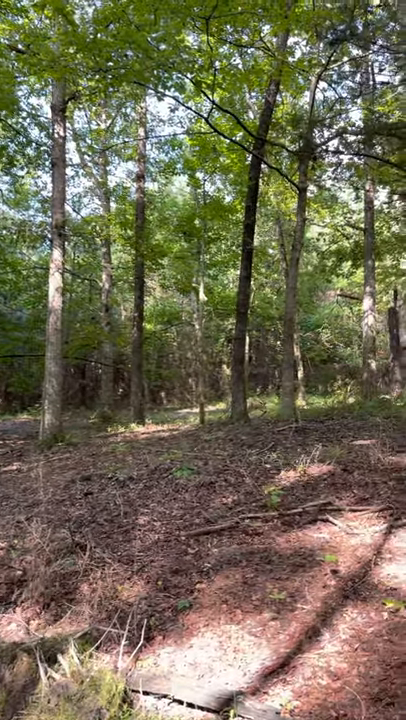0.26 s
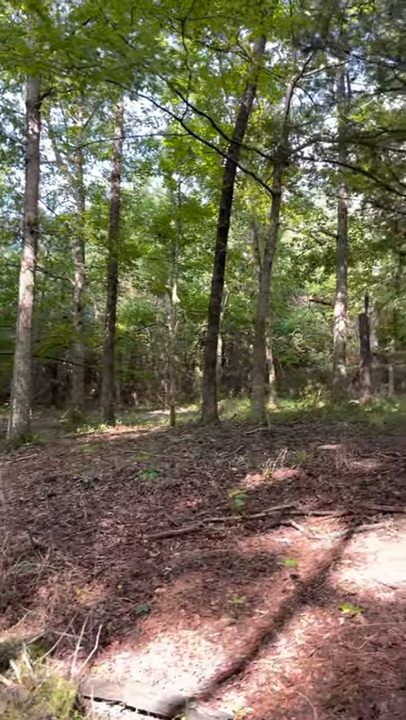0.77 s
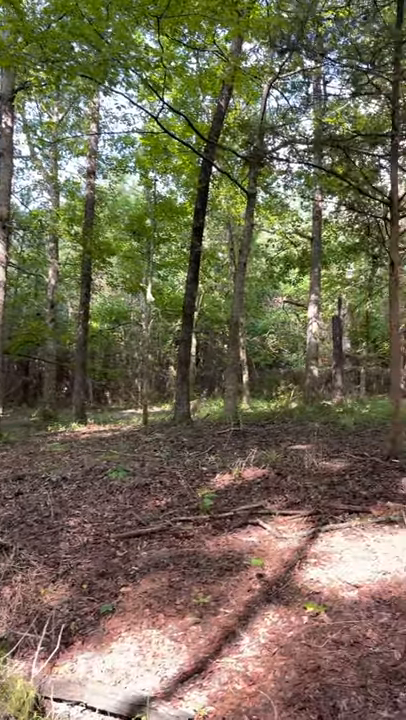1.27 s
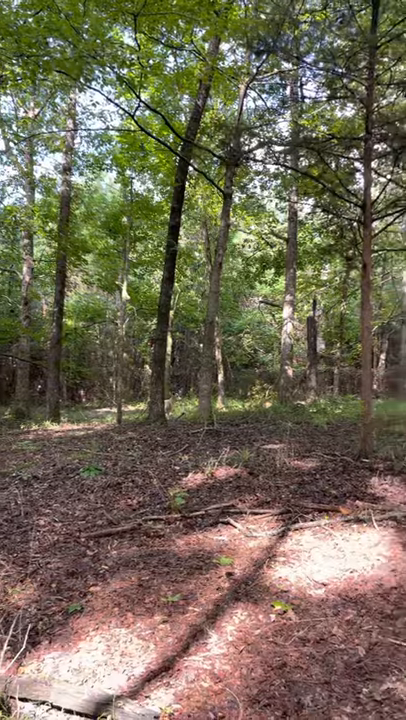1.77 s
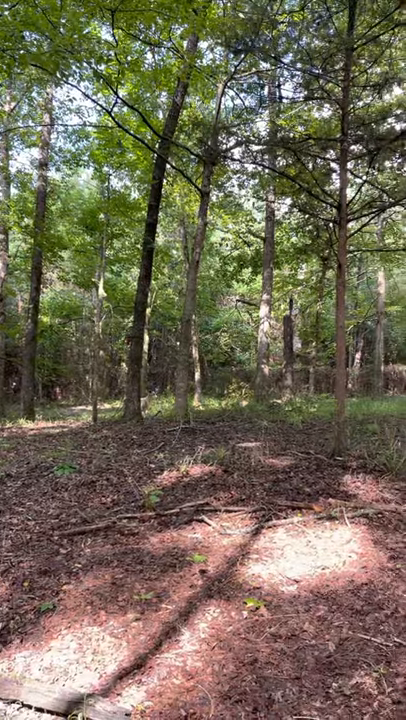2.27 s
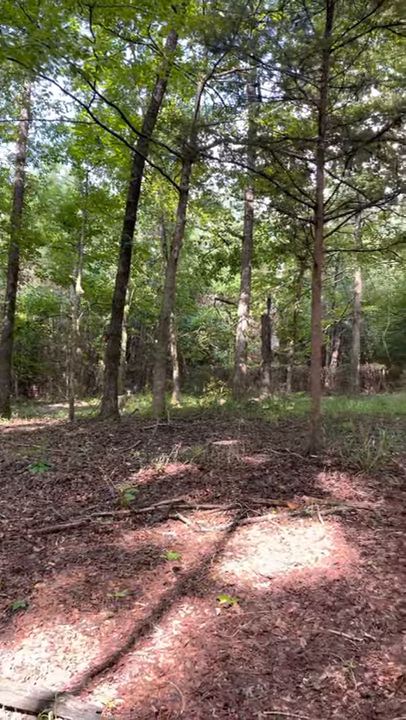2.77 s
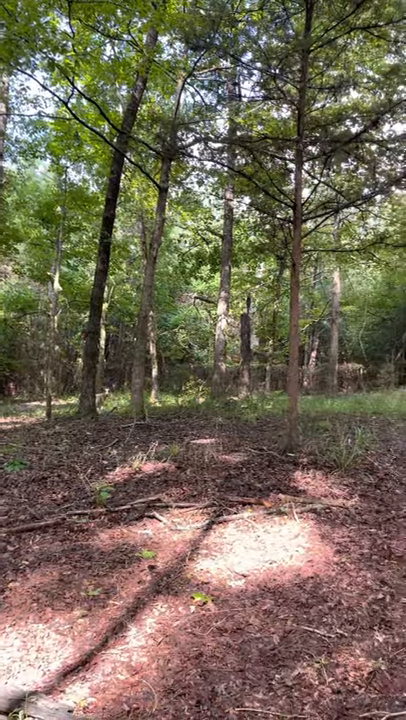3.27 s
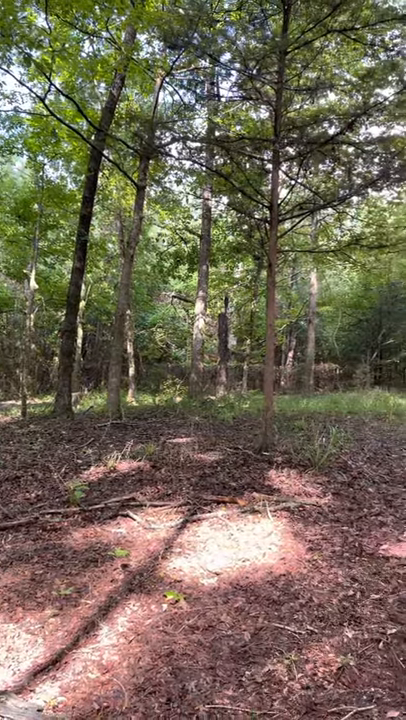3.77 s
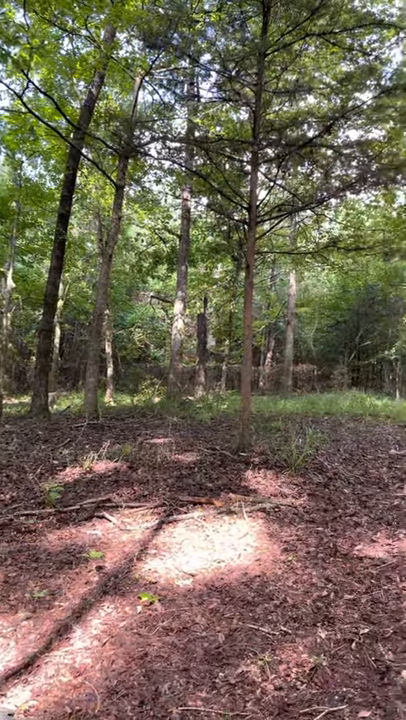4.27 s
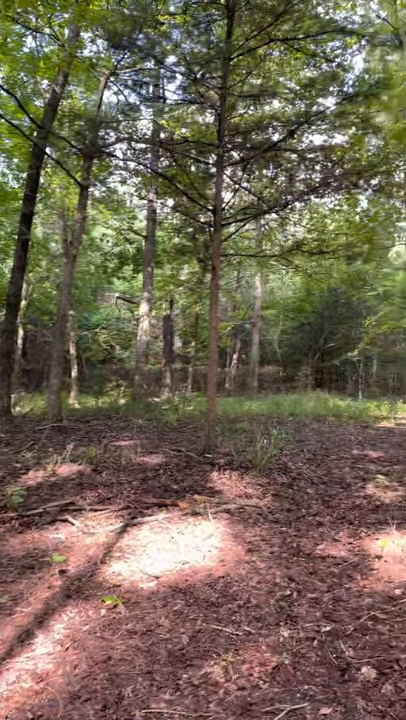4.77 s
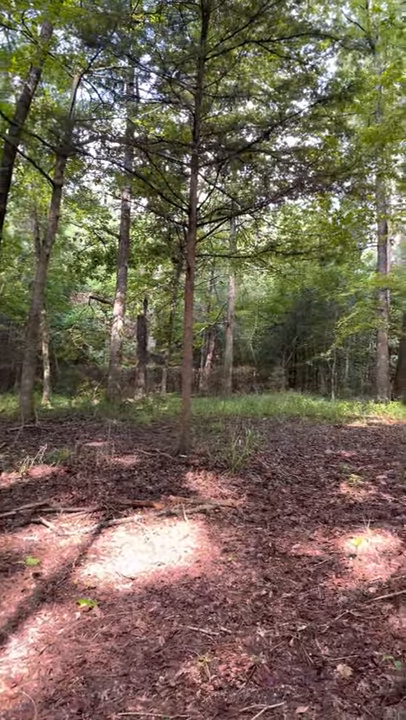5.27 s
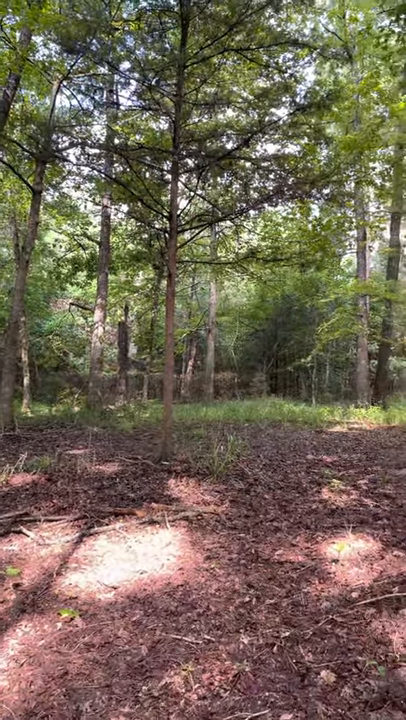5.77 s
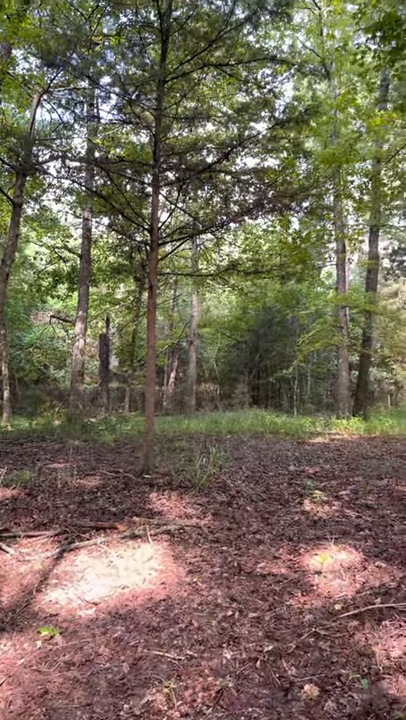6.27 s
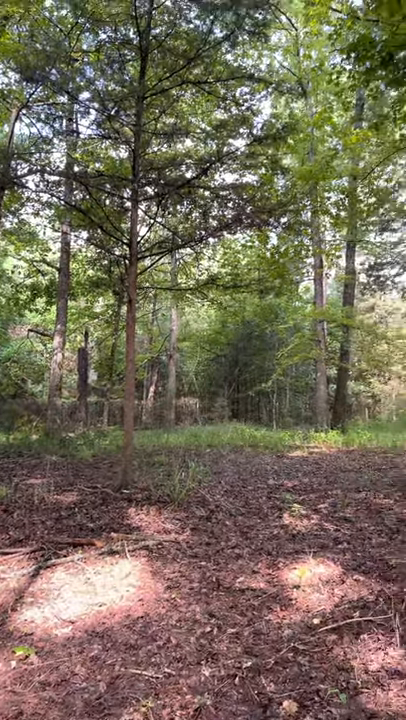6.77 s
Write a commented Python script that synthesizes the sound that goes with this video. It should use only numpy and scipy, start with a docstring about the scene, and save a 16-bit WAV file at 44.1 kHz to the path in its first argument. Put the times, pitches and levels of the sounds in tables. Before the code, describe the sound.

Bright, continuous chirping and hissing insect song surrounds a stereo microphone in open woods. Thin cricket whistles and single frog peeps stand out, even trills pulse on the left, and a small twig cracks early. Midway the rough buzz loses its throb, slows and dies away, leaving the steady chorus. Faint hoarse crow caws come from far off, and scratchy frog notes gather and rise towards the end, over low breeze and faint drone.

```python
"""Small frogs and insects in woodland, as shaped noise bands, pulse trains and soft-edged notes.
From the start a dense far chorus, chirps, buzzing, whistles, a low breeze and a drone sound together;
at 0.3 s tree frogs begin to trill, and near 1.1 s a twig cracks. From about 3 s the buzz slows and fades,
a far crow caws, and a rasping frog climbs in pitch and grows louder towards the end.
Trees scatter many of the callers; left and right channels are partly alike and shifted in phase."""
import sys
import numpy as np
from scipy import signal
from scipy.fft import rfft, irfft
from scipy.io import wavfile
from scipy.ndimage import uniform_filter1d

SR = 44100
rng = np.random.default_rng(int(sys.argv[2]) if len(sys.argv) > 2 else 0)


def transcribe(signal):
    """Save signal, clipped to [-1, 1], as a 16-bit WAV file at the path in sys.argv[1]."""
    frames = np.atleast_2d(signal).T
    limited = np.clip(frames, -1, 1)
    pcm = np.round(limited * 32767).astype(np.int16)
    wavfile.write(sys.argv[1], SR, pcm)


N = 310023  # samples

# In every spectrum the level is relative, per Hz of bandwidth.
# Far frog chorus spectrum (f/Hz, level/dB)
FROG_SPECTRUM = [(1900, -22.5), (2300, -15.5), (2700, -8.5), (3200, 0.1), (3900, -1), (4600, 3), (5300, 0),
                 (6500, -8.5)]
# Far insect spectrum (f/Hz, level/dB)
INSECT_SPECTRUM = [(4200, -18.1), (5200, -6.7), (6000, -2.0), (7300, 0.2), (8100, -1.2), (9000, -8.6),
                   (10000, -10.4), (11200, -9.7), (11700, -14.6), (12300, -22.7), (12700, -35.4)]
# the frogs hold their mean level; the insects ease off slowly
FROGS_DB, INSECTS_DB, INSECTS_FALL_DB_PER_S = -47.5, -42, 0.1747
# how far strands of single pitches stand out of a crowd
STRANDS_DB = 3.0

# Single frog calls that stand out of the chorus
# (middle t/s, length t/s, pitch f/Hz, width f/Hz, level/dB before a common trim and scattering)
SOLO_CALLS = [(.34, .35, 3445, 40, -61), (.45, .9, 3530, 220, -59.5), (.47, .25, 3100, 25, -66),
              (1.35, .25, 4500, 25, -64), (1.5, .7, 4100, 130, -62), (2.81, .35, 3208, 25, -61),
              (2.88, .25, 5749, 25, -56), (2.88, .22, 5490, 25, -59), (2.95, .22, 3488, 25, -65),
              (3.14, .45, 4540, 30, -66), (3.7, .25, 3402, 25, -65), (4.13, .25, 4285, 25, -64),
              (4.9, .3, 4328, 25, -63), (5.39, .25, 5706, 25, -59), (6.18, .3, 3251, 45, -65),
              (6.46, .3, 6093, 25, -58), (6.9, .25, 3402, 25, -64)]

# Body resonance of the buzzing insects (f/Hz, level/dB)
BUZZ_SPECTRUM = [(5500, -15.5), (6500, -8.5), (7000, -2.5), (7450, 1.6), (7900, -0.2), (8400, -8),
                 (9200, -14), (9900, -13), (10500, -13.5), (11500, -22.8), (12400, -35.5)]
# Snap rates of two tymbals that slow as the insects run down (t/s, rate/snaps per s)
FIRST_TYMBAL_RATE = [(0, 418), (1, 410), (2.3, 405), (2.7, 391), (3.1, 386), (4.3, 228), (4.8, 190)]
SECOND_TYMBAL_RATE = [(0, 337), (2.2, 324), (2.7, 309), (3.5, 302), (4.6, 190)]
# shares of the buzz power that arrive as clear snaps from each tymbal; the trees smear the rest
FIRST_SHARE, SECOND_SHARE = .42, .24
# the buzz holds, then runs down ever faster: 10 dB down after the release time
BUZZ_DB, BUZZ_HOLD_UNTIL_S, BUZZ_RELEASE_S = -42.5, 3.23, 1.53
# the throb is half gone at the first time and dies away before the buzz does
THROB_HALF_S, THROB_FADE_S = 2.8, .2
# Thinner insect voice that swells once (f/Hz, level/dB)
SIZZLE_SPECTRUM = [(8000, -10), (8700, -1), (9600, 0), (10300, -5), (10900, -1), (11600, -7), (12300, -22)]
SIZZLE_DB, SIZZLE_PEAK_S, SIZZLE_LENGTH_S, SIZZLE_RISE_DB = -56.5, 3.5, 1, 4

# Long thin cricket whistles
# (middle t/s, length t/s, pitch f/Hz, width f/Hz, level/dB before scattering)
CRICKET_WHISTLES = [(1.9, 3.2, 7225, 24, -54), (1.0, 3.2, 6687, 20, -56.5), (2.6, 1.8, 7530, 24, -53.5),
                    (.5, 1.2, 5920, 24, -58), (1.9, .9, 6180, 24, -57), (5.1, 2.4, 6295, 24, -61),
                    (4.5, 5, 6868, 24, -62), (5.2, 2.6, 3250, 75, -65)]

# Breeze spectrum (f/Hz, level/dB)
BREEZE_SPECTRUM = [(24, -39), (35, -14), (55, -2), (100, 0), (135, -3.5), (175, -13), (240, -12.5),
                   (320, -25), (500, -26.5)]
# Small uneven level changes of the low rush (peak t/s, length t/s, change level/dB)
BREEZE_CHANGES = [(0.73, 0.24, 2.5), (1.24, 0.35, 3.5), (2.03, 0.31, -2), (2.5, 0.097, -5.5),
                  (2.95, 0.18, 3), (3.72, 0.27, 0), (4.35, 0.18, 1.5), (5.4, 0.45, 1), (5.8, 0.2, 1.5),
                  (6.797, 0.1, -5), (6.94, 0.11, 3)]
# the low rush slowly grows under these changes
BREEZE_DB, BREEZE_RISE_DB_PER_S = -58.5, 0.51
# Air moving through far treetops (f/Hz, level/dB)
LEAF_SPECTRUM = [(280, -4.5), (400, -0.5), (520, -2), (750, -3.5), (1000, -8), (1400, -11), (1900, -17.5)]
# Faint low drone from far off (f/Hz, level/dB)
DRONE_SPECTRUM = [(100, -5), (125, 3.5), (150, -4.5), (178, -7.5), (212, 0), (255, -2.5), (310, -10.5),
                  (360, -9.5), (430, -19)]
# Swells and, where negative, sinkings of the drone (peak t/s, length t/s, rise level/dB)
DRONE_CHANGES = [(0.31, 0.085, 3), (0.728, 0.21, 3.5), (1.95, 0.31, -3.5), (3.253, 0.95, -15),
                 (5.0, 0.29, -5), (5.45, 0.4, 1.5), (6.094, 0.22, -3)]
# the drone grows a little under its swells
DRONE_DB, DRONE_RISE_DB_PER_S = -62, 0.5

# Nearer frog trills
# (first note t/s, last note t/s, rate/notes per s, pitch f/Hz, level/dB before scattering and panning)
FROG_TRILLS = [(.30, 2.17, 10.4, 3610, -62), (1.88, 1.99, 10.2, 3600, -58), (.53, 2.6, 10.4, 2720, -71),
               (4.9, 5.7, 6.5, 3200, -63)]

# Cracks of a twig in the leaf litter (t/s, upper edge f/Hz, peak level/dB before scattering)
TWIG_CRACKS = [(1.068, 2000, -52), (1.073, 540, -50), (1.078, 1900, -55)]

# Far crow
# (middle t/s, length t/s, strongest partial f/Hz, width f/Hz, level/dB before scattering)
CROW_CAWS = [(3.27, .18, 1420, 150, -78.5), (4.958, .17, 1385, 90, -73.3), (5.305, .18, 1350, 135, -74.5),
             (5.66, .19, 1390, 95, -73.7)]

# Notes of the rasping frog (middle t/s, level/dB relative to RASP_DB)
RASP_NOTES = [(3.68, -11), (3.81, -10), (3.95, -9), (4.13, -8), (4.3, -12), (4.45, -7), (4.59, -8),
              (4.74, -12), (4.87, -8), (5.0, -8), (5.21, -6.5), (5.35, -6), (5.49, -6), (5.63, -2.5),
              (5.76, -4), (5.93, -2), (6.05, -2), (6.19, -3), (6.31, -3), (6.45, 0), (6.57, 0), (6.69, 2.5),
              (6.82, 1), (6.92, 2)]
# its short, wide notes climb in pitch
RASP_HZ, RASP_RISE_HZ_PER_S, RASP_DB = 2155, 143, -58.5
RASP_WIDTH_HZ, RASP_LENGTH_S = 400, .12

# Likeness of left and right channels, by frequency (f/Hz, likeness/0-1)
CHANNEL_LIKENESS = [(100, 1.0), (250, 0.94), (420, 0.57), (750, 0.19), (1200, 0.52), (1500, 0.98),
                    (2200, 0.97), (2700, 0.1), (4200, 0.4), (4600, 0.62), (4850, 0.93), (5200, 0.68),
                    (5800, 1.0), (6600, 0.87), (8200, 0.88), (8750, 0.99), (9500, 1.0), (10400, 0.78),
                    (11600, 0.78), (11950, 0.99)]
# Phase by which the left channel leads, negative where it lags (f/Hz, phase/rad)
LEFT_LEAD = [(350, -0.05), (900, -0.71), (1500, -0.01), (3400, 0.16), (4200, 1.43), (4850, 3.08),
             (5300, 5.44), (5750, 6.27), (6200, 6.34), (7000, 7.5), (8000, 8.59), (8600, 9.36),
             (9500, 9.43), (10200, 9.97), (11500, 11.8), (11900, 12.53)]
EDGE_HZ = 12600  # upper edge of the sound


def seconds():
    """Uniform sampling: the time of every sample."""
    return np.arange(N) / SR


def gain_of(db):
    """Logarithmic level: decibels to amplitude."""
    return 10 ** (np.asarray(db) / 20)


def evened(x):
    """Normalisation of mean power: scales to rms 1."""
    return x / np.sqrt(np.mean(x ** 2) + 1e-20)


def read(points, hz):
    """Linear interpolation of a table on a log-frequency axis."""
    f, value = np.transpose(points)
    return np.interp(np.log(hz + 1), np.log(f + 1), value)


def add(mix, s, sound):
    """Superposition: mixes in a sound that starts at time s, cut at the ends of the mix."""
    start = round(s * SR)
    sound = sound[max(-start, 0):]
    part = mix[max(start, 0):][:len(sound)]
    part += sound[:len(part)]


def drift(per_s):
    """Low-pass noise: a smooth random curve of rms 1, faster for a larger per_s (Hz)."""
    t = np.arange(0, N / SR, 1 / 2000)
    hz = np.fft.rfftfreq(len(t), t[1])
    spectrum = rfft(rng.standard_normal(len(t))) * np.exp(-(hz / per_s) ** 2)
    return evened(np.interp(seconds(), t, irfft(spectrum, len(t))))


def swell(peak_s, length_s):
    """Gaussian envelope of height 1 that stays above half for the given length."""
    t = np.arange(0, N / SR, 1 / 200)
    bell = .5 ** np.minimum((2 * (t - peak_s) / length_s) ** 2, 20)
    return np.interp(seconds(), t, bell)


def diffuse(spectrum):
    """Incoherent sources: two unrelated noises of one spectrum, falling steeply past its ends."""
    hz = np.fft.rfftfreq(N, 1 / SR)
    low, high = .85 * spectrum[0][0], 1.15 * spectrum[-1][0]
    ends = 1 / np.sqrt((1 + (hz / high) ** 12) * (1 + (low / (hz + 1)) ** 12))
    real, imaginary = rng.standard_normal((2, 2, len(hz)))
    return evened(irfft((real + 1j * imaginary) * ends * gain_of(read(spectrum, hz)), N))


def shimmer(spectrum):
    """Random fluctuation of a sum of many sources: short, thin strands of pitch rise and sink."""
    z = signal.stft(diffuse(spectrum), nperseg=2048, noverlap=1536)[2]
    # smooth across neighbouring bins, then along time
    narrow = uniform_filter1d(rng.standard_normal(z.shape[1:]), size=3, axis=0)
    strands = np.tanh(evened(uniform_filter1d(narrow, size=22, axis=1)))
    crowd = signal.istft(z * gain_of(STRANDS_DB * strands), nperseg=2048, noverlap=1536)[1]
    return evened(crowd[:, :N])


def note(length, hz, width_hz, rough):
    """Narrow-band resonance: a tone blended with noise at the same pitch under a soft-edged envelope."""
    t = np.arange(int(length * SR)) / SR
    size = int(np.ceil(2 * length)) * SR // 2
    ring = np.exp(-((np.fft.rfftfreq(size, 1 / SR) - hz) / width_hz) ** 2)
    rasp = evened(irfft(rfft(rng.standard_normal(size)) * ring, size)[:len(t)])
    tone = evened(np.sin(2 * np.pi * (hz * t + rng.random())))
    rough = np.clip(rough, 0, 1)
    return evened((1 - rough) * tone + rough * rasp) * np.hanning(len(t))


def woods(x, t60, wet_db):
    """Multiple scattering: trunks give a sound a different exponentially decaying tail in each channel."""
    t = np.arange(SR // 2) / SR
    tail = rng.standard_normal((2, len(t))) * gain_of(-60 * t / t60)
    tail /= np.linalg.norm(tail, axis=1, keepdims=True)
    wet = gain_of(wet_db)  # tail relative to direct sound
    scattered = signal.fftconvolve(x[None], tail, axes=1)[:, :N]
    return (x + wet * scattered) / np.hypot(1, wet)


def far_chorus():
    """Incoherent summation: countless far frogs and insects merge into gently shimmering bands."""
    frogs = shimmer(FROG_SPECTRUM) * gain_of(FROGS_DB + 0.68 * drift(21))
    insects_db = INSECTS_DB - INSECTS_FALL_DB_PER_S * seconds() + 1.0 * drift(220)
    return frogs + shimmer(INSECT_SPECTRUM) * gain_of(insects_db)


def peepers(count=60, low_hz=3000, high_hz=8000, level_db=-52):
    """Periodic excitation: middle-distance callers chirp in bouts, each on its own pitch and beat."""
    out = np.zeros(N)
    for k, (pitch, beat, start, bout, size) in enumerate(rng.random((count, 5))):
        hz = low_hz + (high_hz - low_hz) * np.sqrt((k + pitch) / count)
        chirp = note(0.067, hz, 140, 0.86) * hz / high_hz  # the shriller callers are the louder
        chirps_per_s = 4 + 8 * beat
        for s in np.arange(start * .2, N / SR, 1 / chirps_per_s):
            effort = np.sin(np.pi * (s / 3 + bout)) ** 4  # one bout every 3 s
            add(out, s, (0.87 + size) * effort * chirp)
    return gain_of(level_db) * evened(woods(out, t60=0.12, wet_db=23))


def soloists(trim_db=-0.5):
    """Narrow-band resonance: frogs a little nearer than the rest, each heard for one call."""
    out = np.zeros(N)
    for s, length, hz, width_hz, db in SOLO_CALLS:
        add(out, s - length / 2, gain_of(trim_db + db) * note(length, hz, width_hz, 1))
    return woods(out, t60=.15, wet_db=-6)


def snaps(rates):
    """Impulsive excitation: the power envelope of a slightly uneven train of decaying tymbal snaps."""
    turns = np.cumsum(np.interp(seconds(), *np.transpose(rates))) / SR
    return evened(np.exp(-(turns % 1) / .3) * gain_of(.6 * drift(300))) ** 2


def buzzers(strokes_hz=39.95, depth=0.29):
    """Amplitude modulation of a resonance: tymbal snaps and a throb shape the buzz as it slows and fades."""
    turns = np.cumsum(strokes_hz + 0.29 * drift(1.0)) / SR
    throbbing = 1 / (1 + np.exp((seconds() - THROB_HALF_S) / THROB_FADE_S))
    strokes = 1 + depth * throbbing * np.cos(2 * np.pi * turns)
    running_down = np.maximum(seconds() - BUZZ_HOLD_UNTIL_S, 0) / BUZZ_RELEASE_S
    effort = gain_of(-10 * running_down ** 2)
    first = FIRST_SHARE * (snaps(FIRST_TYMBAL_RATE) - 1)
    second = SECOND_SHARE * (snaps(SECOND_TYMBAL_RATE) - 1)
    tymbals = np.sqrt(1 + first + second)  # power to amplitude
    small_body = signal.butter(4, 4500, "high", fs=SR, output="sos")
    body = signal.sosfilt(small_body, tymbals * shimmer(BUZZ_SPECTRUM))
    return gain_of(BUZZ_DB + 0.5 * drift(6.9)) * effort * strokes * body


def sizzle():
    """Band-limited noise: a thinner insect voice rises once out of a quiet simmer."""
    level_db = SIZZLE_DB + SIZZLE_RISE_DB * swell(SIZZLE_PEAK_S, SIZZLE_LENGTH_S)
    return gain_of(level_db + 1.6 * drift(17)) * diffuse(SIZZLE_SPECTRUM)


def crickets():
    """Narrow-band noise: thin wavering whistles rise out of the chorus and sink back."""
    out = np.zeros(N)
    for s, length, hz, width_hz, db in CRICKET_WHISTLES:
        add(out, s - length / 2, gain_of(db) * note(length, hz, width_hz, 1))
    return woods(out, t60=0.38, wet_db=3)


def breeze():
    """Broadband flow noise: a soft low rush wavers unevenly and slowly grows."""
    changes_db = sum(change_db * swell(s, length) for s, length, change_db in BREEZE_CHANGES)
    level_db = BREEZE_DB + BREEZE_RISE_DB_PER_S * seconds() + changes_db
    return gain_of(level_db) * diffuse(BREEZE_SPECTRUM)


def treetops(level_db=-67.0):
    """Broadband flow noise: a steadier wash of air in far leaves."""
    return gain_of(level_db + 0.61 * drift(4.4)) * shimmer(LEAF_SPECTRUM)


def far_drone():
    """Band-limited noise: a faint low drone swells and sinks."""
    swells_db = sum(rise_db * swell(s, length) for s, length, rise_db in DRONE_CHANGES)
    level_db = DRONE_DB + DRONE_RISE_DB_PER_S * seconds() + swells_db
    return gain_of(level_db) * diffuse(DRONE_SPECTRUM)


def trilling_frogs():
    """Periodic excitation: short notes repeat evenly as trills, louder on the left."""
    out = np.zeros(N)
    for first, last, per_s, hz, db in FROG_TRILLS:
        for k in range(round((last - first) * per_s) + 1):
            add(out, first + k / per_s - .035, gain_of(db) * note(0.075, hz, 90, 0.6))
    return woods(out, t60=.25, wet_db=-3) * gain_of([[1.5], [-2.5]])  # left, right


def twig():
    """Damped impulse: sharp and duller cracks in quick succession, as decaying noise damped by leaves."""
    t, out = np.arange(SR // 20) / SR, np.zeros(N)
    for s, top_hz, db in TWIG_CRACKS:
        damping = signal.butter(2, [280, top_hz], "band", fs=SR, output="sos")
        crack = signal.sosfilt(damping, rng.standard_normal(len(t)) * np.exp(-t / .0045))
        add(out, s, gain_of(db) * crack / abs(crack).max())
    return woods(out, t60=.12, wet_db=-9)


def crow():
    """Propagation loss: only the strongest partial of each hoarse caw carries this far."""
    out = np.zeros(N)
    for s, length, hz, width_hz, db in CROW_CAWS:
        add(out, s - length / 2, gain_of(db) * note(length, hz, width_hz, 0.96))
    return woods(out, t60=0.3, wet_db=-10)


def rasping_frog():
    """Rough resonance: a hoarse frog deeper in the trees, its notes rising in pitch and running together."""
    out = np.zeros(N)
    for s, db in RASP_NOTES:
        hz = RASP_HZ + RASP_RISE_HZ_PER_S * (s - RASP_NOTES[0][0])
        rasp = note(RASP_LENGTH_S, hz, RASP_WIDTH_HZ, 0.91)
        add(out, s - RASP_LENGTH_S / 2, gain_of(RASP_DB + db) * rasp)
    return woods(out, t60=.8, wet_db=4)


def widened(field):
    """Stereo width: two signals become left and right, partly alike and shifted in phase."""
    hz = np.fft.rfftfreq(N, 1 / SR)
    left, other = rfft(field)
    same = np.clip(read(CHANNEL_LIKENESS, hz), 0, 1)
    right = same * left + np.sqrt(1 - same ** 2) * other
    right = right * np.exp(-1j * read(LEFT_LEAD, hz))
    return irfft(np.array([left, right]), N)


def scene():
    """Superposition: the surrounding chorus and breeze, with the single callers and twig in front."""
    voices = far_chorus() + peepers() + soloists() + buzzers() + sizzle() + crickets()
    air = breeze() + treetops() + far_drone()
    return widened(voices + air) + trilling_frogs() + twig() + crow() + rasping_frog()


def record(dry):
    """Band limitation: a linear-phase low-pass leaves nothing above 12.6 kHz but its steep skirt."""
    low_pass = signal.firwin(401, EDGE_HZ, window=("kaiser", 9), fs=SR)
    return signal.oaconvolve(dry, low_pass[None], "same")


dry = scene()
out = record(dry)
transcribe(out)
```